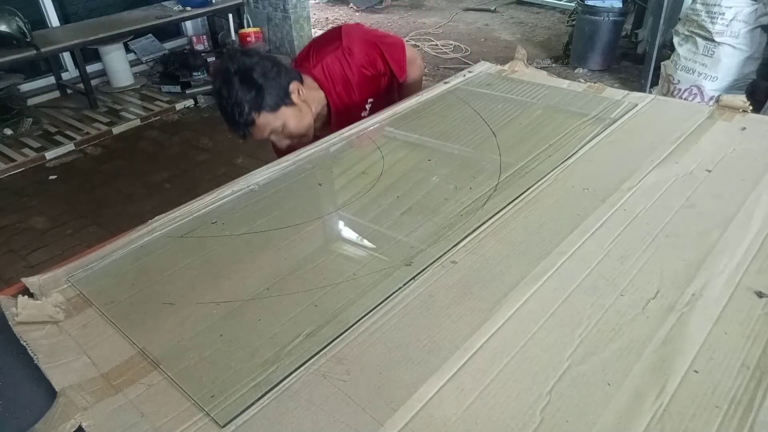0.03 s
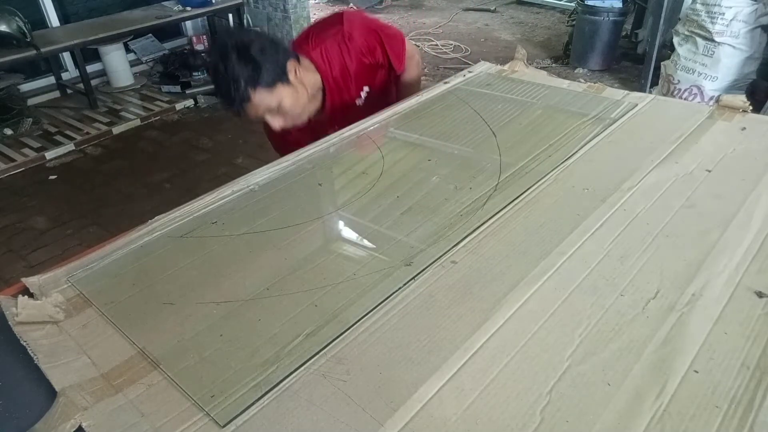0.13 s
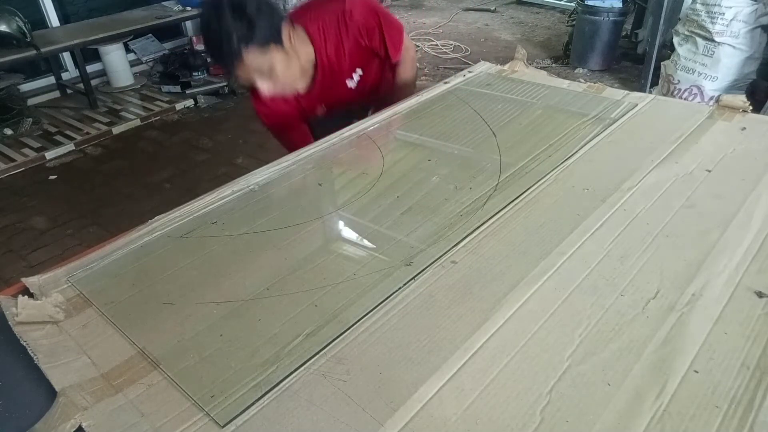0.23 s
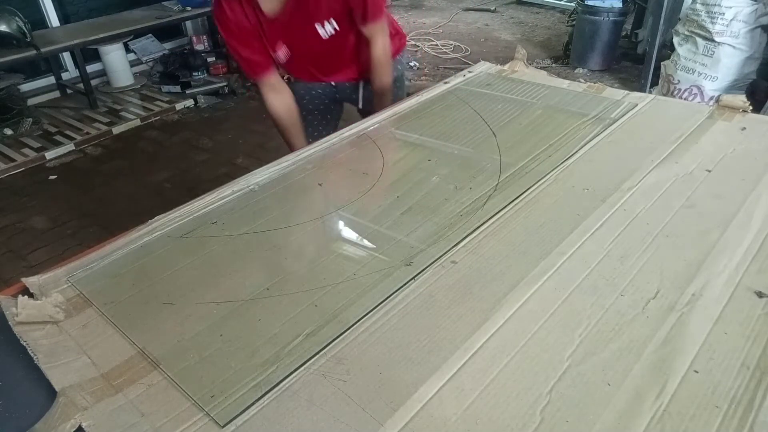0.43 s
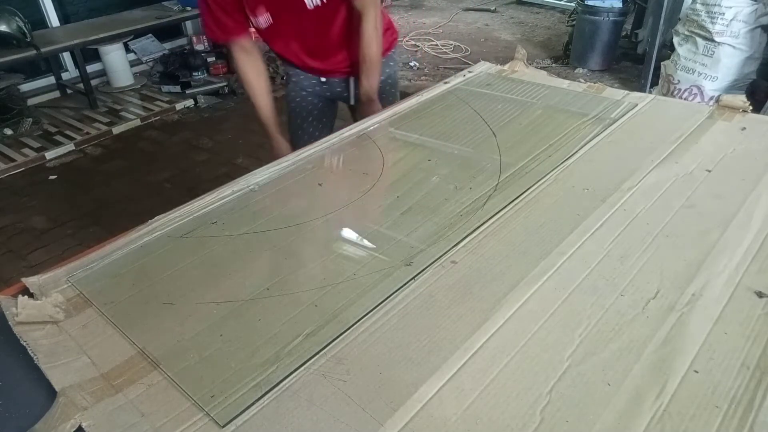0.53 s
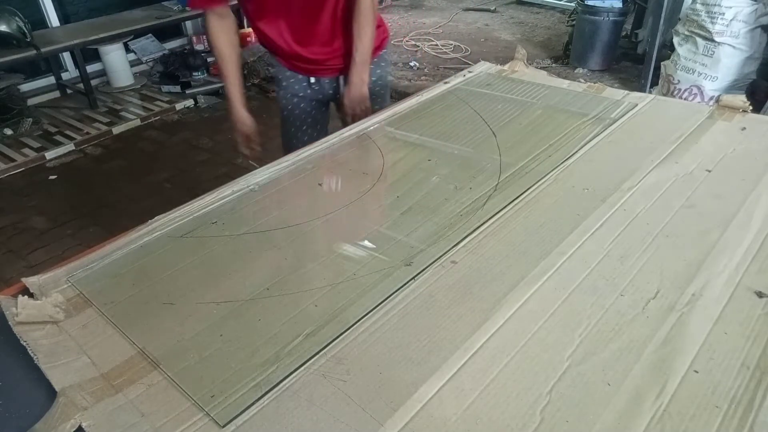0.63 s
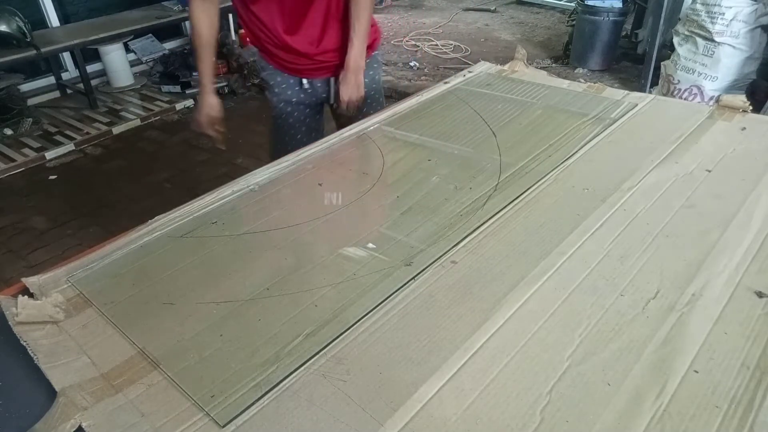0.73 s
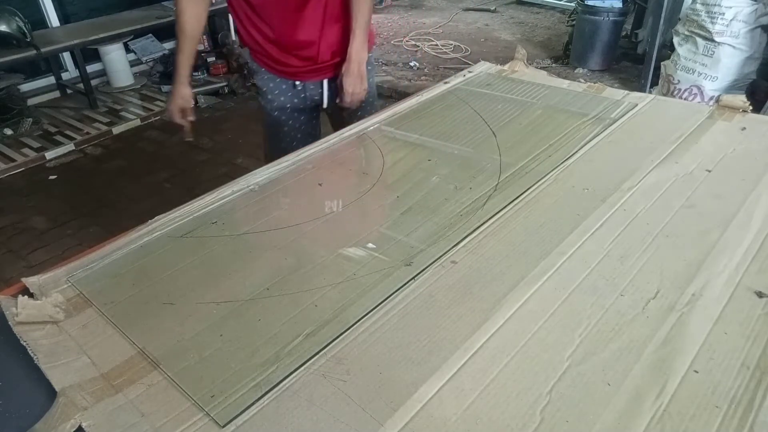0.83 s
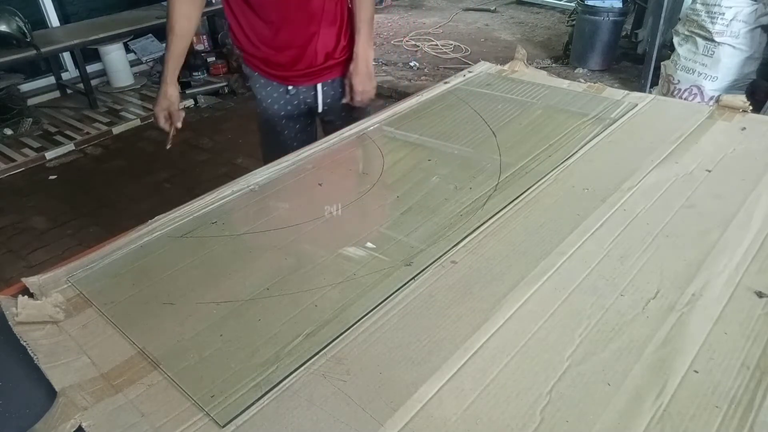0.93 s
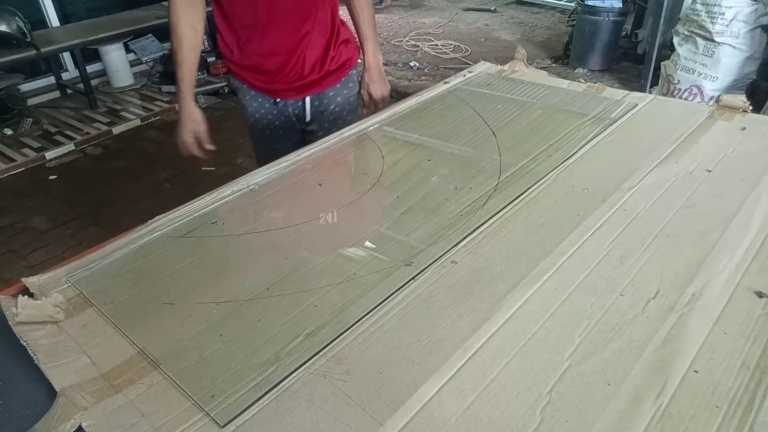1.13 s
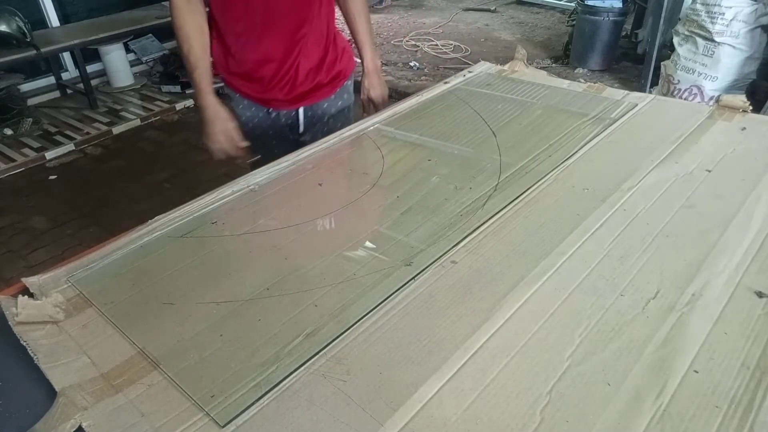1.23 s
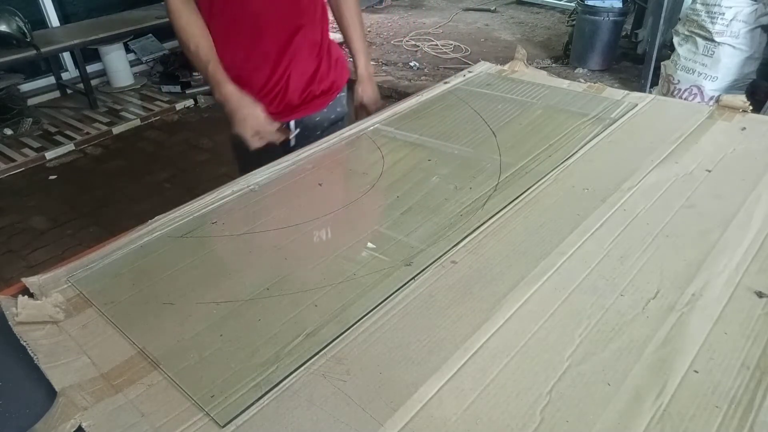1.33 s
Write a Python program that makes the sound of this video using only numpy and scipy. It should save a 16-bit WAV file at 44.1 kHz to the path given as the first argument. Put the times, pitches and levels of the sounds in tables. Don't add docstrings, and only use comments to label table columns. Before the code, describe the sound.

A sharp metallic clank, several contacts in a quick chatter, rings and echoes through a workshop; then small distant thuds, light scuffs and a faint late scrape over soft hiss and a low engine idle, small microphone.

```python
import sys
import numpy as np
from scipy import signal
from scipy.fft import rfft, irfft, next_fast_len
from scipy.io import wavfile
from scipy.ndimage import uniform_filter1d, map_coordinates

SR = 44100
rng = np.random.default_rng(int(sys.argv[2]) if len(sys.argv) > 2 else 0)


def rack_gain(trim_db):
    fader = np.asarray(trim_db, float)
    return 10 ** (fader / 20)


def log_audio(samples):
    frames = np.atleast_2d(samples).T
    limited = np.clip(frames, -1, 1)
    pcm = np.round(limited * 32767).astype(np.int16)
    wavfile.write(sys.argv[1], SR, pcm)


N = 61739

# f/Hz, level/dB
CONTACT = [(200, -23.5), (400, -8), (750, 6.5), (1400, 7.5), (2500, 6.5), (3500, 7.5), (8000, 2.5),
           (16000, -0.5)]
# t/s, gain/dB
GAIN_CONTROL = [
    (0, 4),
    (.112, 4.5),
    (.124, -2),
    (.17, -5.5),
    (.3, 2),
    (.45, 3.5),
    (.56, 10),
    (.7, 9),
]
SHED_DB = 8


def unit(x):
    return x / np.sqrt(np.mean(x ** 2) + 1e-20)


def along(points, hz):
    f, v = np.transpose(points)
    return np.interp(np.log(hz + 1), np.log(f + 1), v)


def curves(rows):
    s, *cols = np.transpose(rows)
    return [np.interp(np.arange(N) / SR, s, c) for c in cols]


def wobble(rate):
    return map_coordinates(rng.standard_normal(400), [np.arange(N) * rate / SR])


def filtered(x, response):
    m = next_fast_len(len(x) + SR // 2)
    return irfft(rfft(x, m) * response(np.fft.rfftfreq(m, 1 / SR)), m)[:len(x)]


def causal(points):
    def response(hz):
        cepstrum = irfft(np.log(rack_gain(along(points, hz))))
        half = len(cepstrum) // 2
        cepstrum[1:half] *= 2
        cepstrum[half + 1:] = 0
        return np.exp(rfft(cepstrum))
    return response


def resonances(peaks):
    def response(f):
        total = 0
        for k, (centre, width, db) in enumerate(peaks):
            damping = 1j * f * width
            total = total + (-1) ** k * rack_gain(db) * damping / (centre * centre - f * f + damping)
        return total
    return response


def rush(spectrum, patchy_db):
    z = signal.stft(rng.standard_normal(N + 512), nperseg=512)[2]
    field = uniform_filter1d(rng.standard_normal(z.shape), size=6, axis=0)
    field = uniform_filter1d(field, size=10, axis=1)
    x = signal.istft(z * rack_gain(patchy_db * unit(field)), nperseg=512)[1][:N]
    return unit(filtered(x, lambda hz: rack_gain(along(spectrum, hz))))


def shed(x):
    # f/Hz, t60/s
    decay_times = [(300, 0.51), (1000, 0.48), (3000, .5), (7000, 0.43), (15000, 0.43)]
    direct_db, build_s = -16, 0.0021
    hz, t, z = signal.stft(rng.standard_normal(SR), SR, nperseg=256)
    decay_db = -60 * t / along(decay_times, hz)[:, None]
    tail = signal.istft(z * rack_gain(decay_db), SR, nperseg=256)[1]
    tail = tail * (1 - np.exp(-np.arange(len(tail)) / SR / build_s))
    tail = tail / np.linalg.norm(tail)
    return rack_gain(direct_db) * x + rack_gain(SHED_DB) * signal.fftconvolve(x, tail)[:len(x)]


def air():
    # f/Hz, level/dB per Hz
    hiss = [(60, -1), (200, 0.5), (500, -6), (1000, -13), (2500, -16.5), (4000, -21), (8000, -19.5),
            (16000, -35.5)]
    return rack_gain(-58 + 0.47 * wobble(4.25)) * rush(hiss, patchy_db=0.95)


def engine():
    # t/s, firing f/Hz, boom level/dB, exhaust level/dB
    idle = [(0.0, 25.4, -42.5, -56.5), (0.066, 25.65, -48.5, -44), (0.108, 24.2, -42.5, -50),
            (0.146, 24.8, -61.5, -64), (0.272, 24.85, -50.5, -51), (0.598, 25.08, -49.5, -48),
            (0.738, 24.85, -47.5, -49), (0.836, 25.24, -44, -43.5), (0.954, 25.46, -46, -48.5),
            (1.136, 25.13, -66, -46.5), (1.256, 24.8, -58, -48), (1.32, 24.5, -65, -45),
            (1.374, 24.55, -52, -66.5), (1.4, 25.8, -68, -69)]
    # multiple of the firing rate, level/dB
    exhaust_orders = [(3, 4), (4, -1), (5, -1.5), (6, 1.5), (7, -15), (8, -11)]
    # f/Hz, level/dB per Hz
    rumble = [(30, -36), (60, -2), (120, 8.5), (200, -3), (350, -31), (700, -48), (1100, -120)]
    rumble_db, waver_db = -6, 2.5
    first_firing, lag = 0.316, 0.185
    hz, boom_db, exhaust_db = curves(idle)
    turn = np.cumsum(hz) / SR + first_firing

    def order(k):
        level = rack_gain(waver_db * wobble(8.45))
        phase = 2 * np.pi * (k * turn - lag * k * k / 10) + 0.39 * wobble(6.09)
        return level * np.cos(phase)

    lines = unit(sum(rack_gain(db) * order(k) for k, db in exhaust_orders))
    exhaust = unit(lines + rack_gain(rumble_db) * rush(rumble, patchy_db=3))
    return rack_gain(-curves(GAIN_CONTROL)[0]) * (rack_gain(boom_db) * unit(order(2)) + rack_gain(exhaust_db) * exhaust)


def scrape():
    # t/s, level/dB
    drag = [
        (1.17, -80),
        (1.232, -69),
        (1.248, -52),
        (1.29, -51),
        (1.33, -52.5),
        (1.4, -48),
    ]
    # f/Hz, width/Hz, level/dB
    piece = [(418, 29, 3), (528, 41, 0), (1110, 66, -10), (2460, 59, 3.5), (3620, 95, -27),
             (3960, 66, -0.5), (7260, 170, -32)]
    slip_rate, broad_db = 2200, -18.5
    chance, size = rng.random(N), rng.standard_normal(N)
    slips = unit((chance < slip_rate / SR) * size)
    ringing = filtered(slips, resonances(piece))
    body = unit(ringing + rack_gain(broad_db) * filtered(slips, causal(CONTACT)))
    return shed(rack_gain(curves(drag)[0] - SHED_DB) * body)


def scuffs():
    # t/s, length/s, level/dB
    brushes = [
        (0.627, 0.02, -54.5),
        (0.716, 0.041, -59.5),
        (.914, .013, -67),
    ]
    # f/Hz, level/dB
    brush_spectrum = [(500, -20), (1500, 9), (3000, 5), (7000, -12), (16000, 1.5)]
    fade_s = 0.099
    t = np.arange(N) / SR
    shape = np.zeros(N)
    for s, length, db in brushes:
        fade = np.clip(t - s - length, 0, None) / fade_s
        shape += (t >= s) * rack_gain(db - 60 * fade)
    return shape * rush(brush_spectrum, patchy_db=4.2)


def thuds():
    # t/s, level/dB, t60/s
    contacts = [
        (0.537, -55, 0.034),
        (0.649, -43, 0.025),
        (.69, -50, 0.056),
        (0.721, -43, 0.022),
        (0.778, -61, 0.044),
        (0.917, -60, 0.014),
        (1.128, -55, 0.021),
        (1.191, -56.5, 0.14),
    ]
    hardness = [-26, -11, -13.5, -11, -13, 3, -11, -14]
    # f/Hz, width/Hz, level/dB
    board = [(386, 81, -1.5), (475, 49, 3), (1050, 117, -7.5), (1940, 310, -10), (3020, 260, -15)]
    out, t = np.zeros(N), np.arange(N) / SR
    for (s, db, t60), bright_db in zip(contacts, hardness):
        force = (t >= s) * rack_gain(db - 60 * np.abs(t - s) / t60) * rng.standard_normal(N)
        thump = rack_gain(17.5) * filtered(force, resonances(board))
        out += shed(thump + rack_gain(bright_db) * filtered(force, causal(CONTACT)))
    return out


def strike(s, db, ring_db, modes):
    t = np.arange(SR) / SR
    crack = filtered(rack_gain(23.5) * (t == 0), causal(CONTACT))
    ring = sum(rack_gain(level - 60 * t / t60) * np.sin(2 * np.pi * hz * t) for hz, level, t60 in modes)
    out = np.zeros(N + 2 * SR)
    start = SR // 2 + round(s * SR)
    out[start:start + SR] = rack_gain(db) * (crack + rack_gain(ring_db) * ring)
    return out


def steel():
    # t/s, crack level/dB, ring over crack level/dB
    blows = [
        (0.1321, -18.5, -4),
        (.139, -21, 10),
        (0.1447, -22.5, -2),
        (.148, -14, -5),
    ]
    tool_hz = [1740, 2078, 2910, 3489, 3790, 4169, 4662, 6142, 7057, 7541, 10360, 13060, 13702, 14552]
    # level/dB, t60/s
    tool_modes = [(-29, 0.62), (-10.5, 0.59), (-14, 0.71), (-3.5, 0.23), (-0.5, 0.21), (1, 0.33),
                  (-8.5, 0.63), (-3, 0.44), (-1.5, 0.34), (-7.5, 0.39), (-1.5, 0.24), (-19, .39),
                  (-7, 0.29), (-24, .4)]
    # f/Hz, level/dB, t60/s
    sheet = [(743.5, -15.5, 0.25), (1036, -17.5, 0.11), (1086, -9, 0.13), (1896, -8.5, 0.19),
             (2922.5, -4.5, 0.14), (3205, -12.5, .1), (3650, -27, 0.14), (6650, -9, 0.11),
             (7730, -13, 0.13), (8200, -8, 0.087), (10200, -40, .1), (12100, -34, .12), (14000, -26, .1),
             (15000, -22, .1)]
    # f/Hz, level/dB, t60/s
    earlier_modes = [(1124, -23.5, 0.34), (2800, -6, 0.13), (2870, -5.5, 0.091), (3472, -26, 0.092),
                     (6400, -4, 0.067)]
    # (f/Hz, level/dB, t60/s)
    far_tap = (.595, -68, [(1830, 2, .07), (2400, -6, .05)])
    # f/Hz, level/dB
    low_cut = [(60, -30), (150, -20), (300, 0)]
    own_share, tool_db = 0.31, -9
    own = [(hz, db, own_share * t60) for hz, (db, t60) in zip(tool_hz, tool_modes)] + sheet
    now = sum(shed(strike(s, db, tool_db + ring_db, own)) for s, db, ring_db in blows)
    before = strike(-0.06, -39, -0.5, earlier_modes)
    tap_s, tap_db, tap_modes = far_tap
    tap = strike(tap_s, tap_db, 8.8, tap_modes)
    struck = now + shed(before) + shed(tap)
    return filtered(struck, causal(low_cut))[SR // 2:][:N]


def scene():
    return (air() + engine() + scrape() + scuffs() + thuds() + steel())[None]


def roll_off(x):
    return signal.sosfilt(signal.butter(12, 16430, fs=SR, output="sos"), x)


def record(dry):
    # f/Hz, level/dB
    capsule = [(3800, 0), (5000, -14), (6000, -11), (7300, 4.5), (8500, -8), (11700, -13), (14500, -8.5),
               (15400, -6)]
    top_hz = 15550
    x = filtered(dry[0], causal(capsule)) * rack_gain(curves(GAIN_CONTROL)[0])
    x = filtered(x, lambda hz: np.where(hz < top_hz, 1, rack_gain(-38)))
    return roll_off(x[None])


dry = scene()
out = record(dry)
log_audio(out)
```